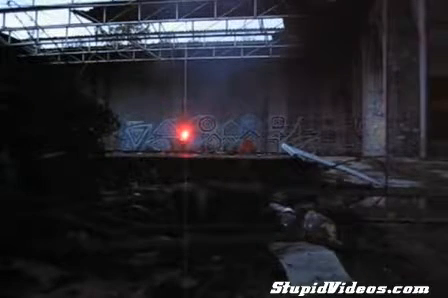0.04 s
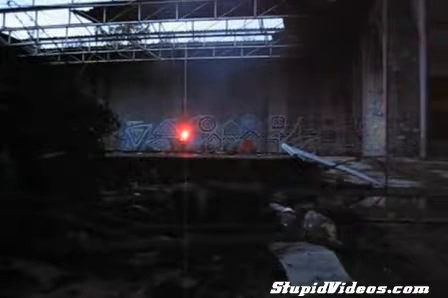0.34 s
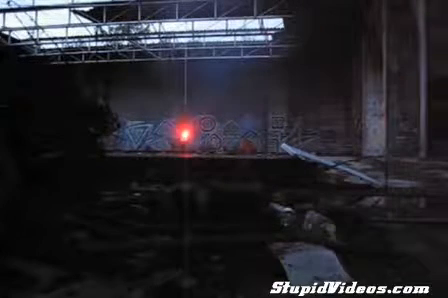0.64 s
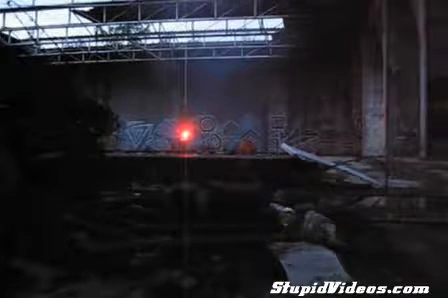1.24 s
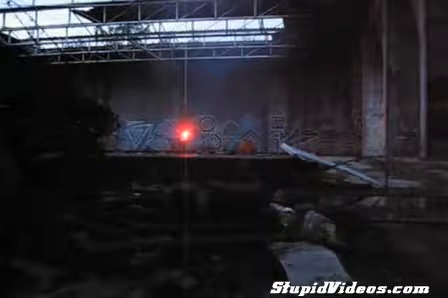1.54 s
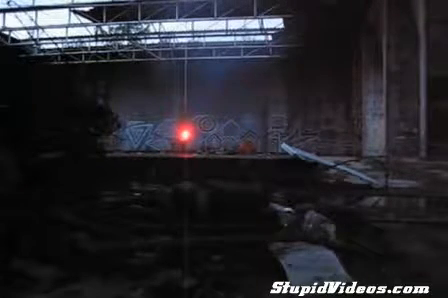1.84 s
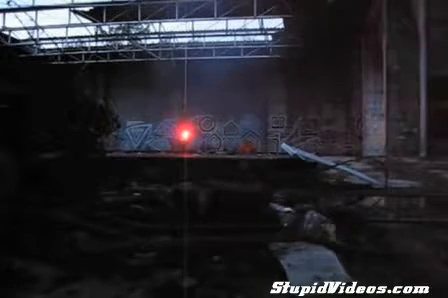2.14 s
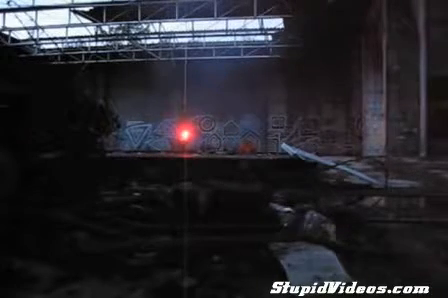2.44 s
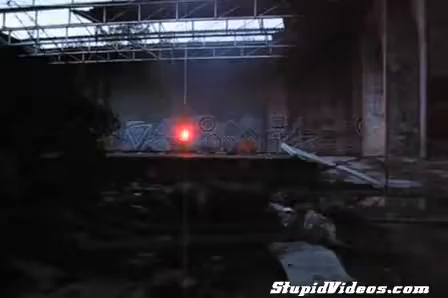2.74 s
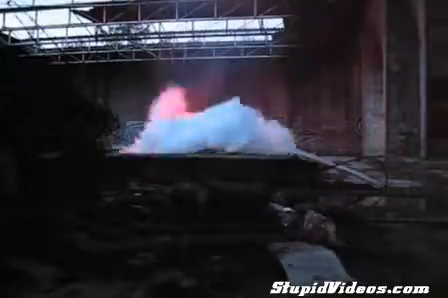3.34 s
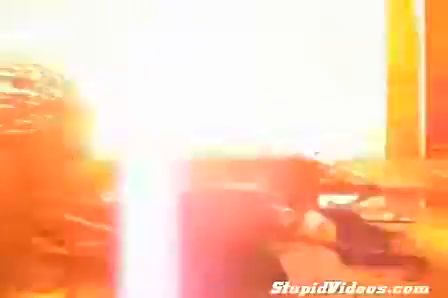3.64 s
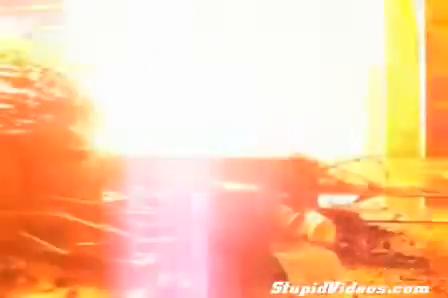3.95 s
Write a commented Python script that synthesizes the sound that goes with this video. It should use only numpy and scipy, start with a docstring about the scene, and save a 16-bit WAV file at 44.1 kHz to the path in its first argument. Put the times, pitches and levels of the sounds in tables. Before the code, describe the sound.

Gas explosion in a derelict hall: faint flare hiss, sudden crack, loud rush and distorted thuds.

```python
"""Gas tank rupture and fireball

A flare hisses over a low rumble beside a gas tank in a derelict hall. The tank cracks open, the gas
rushes out as a bright jet that swells into a roar, and the cloud ignites. The fireball's slow
pressure waves pin the overloaded microphone, chopping the roar into sputters and thuds."""
import sys
import numpy as np
from scipy import signal
from scipy.fft import rfft, irfft
from scipy.io import wavfile
from scipy.ndimage import uniform_filter1d

SR = 44100
rng = np.random.default_rng(int(sys.argv[2]) if len(sys.argv) > 2 else 0)


def master_out(mix):
    """Clip the mix to full scale and print it as 16-bit PCM to the path in sys.argv[1]."""
    frames = np.transpose(np.atleast_2d(mix))
    ceiling = np.clip(frames, -1, 1)
    pcm = np.round(ceiling * 32767).astype(np.int16)
    wavfile.write(sys.argv[1], SR, pcm)


N = 4 * SR

# tone of the flare's hiss: f/Hz, relative level/dB
HISS_SPECTRUM = [(20, -18), (200, -6), (330, -3.5), (450, -4.5), (620, -3.5), (800, -1), (1100, -5),
                 (1800, -5.5), (3200, -7.5), (4400, -6), (6800, -10.5), (9000, -19), (11000, -22.5),
                 (15000, -19.5)]
# fader ride on the hiss: t/s, level/dB
HISS_FADER = [(0, -42.5), (.4, -43.5), (1.15, -43.5), (1.4, -44.5), (1.85, -44), (2.05, -42.5), (2.5, -43),
              (2.9, -43.5)]
# tone of the hall's low rumble: f/Hz, relative level/dB
RUMBLE_SPECTRUM = [(15, -48), (35, -7), (58, 0), (72, -5), (88, 5.5), (112, -8.5), (140, -3), (168, 0.5),
                   (200, -14), (260, -15.5), (400, -57), (1000, -68)]
# fader ride on the rumble: t/s, level/dB
RUMBLE_FADER = [(0, -40.5), (.6, -41), (1.2, -37.5), (1.45, -41.5), (1.9, -37.5), (2.15, -40), (2.9, -38)]
# soft whistles of the flame: peak t/s, length/s, f/Hz, level/dB
WHISTLES = [(.16, 0.34, 1160, -56), (1.127, 0.28, 1280, -53.5), (2.12, 0.22, 1266, -53.5)]
# tone of the tank's shell cracking: f/Hz, relative level/dB
CRACK_SPECTRUM = [(20, -5), (150, 21), (600, 1), (2500, 0), (6000, -5.5), (15000, -36)]
# tone of the gas jet: f/Hz, relative level/dB
JET_SPECTRUM = [(20, 1), (90, -4), (200, 2.5), (420, 2), (700, 1.5), (1400, 3), (2800, 2.5), (5000, -4.5),
                (9500, -8.5), (11000, -36), (13000, -7), (16000, -53)]
# fader ride on the jet: t/s, level/dB
JET_FADER = [(2.97, -15.5), (3.03, -15.5), (3.12, -11.5), (3.3, -12.5), (3.55, -11), (3.72, -13.5),
             (4.0, -13.5)]
# tone of the spreading cloud's roar, ringing in the hall: f/Hz, relative level/dB
ROAR_SPECTRUM = [(20, -21), (60, -8), (130, 0.5), (230, -1), (320, -3), (440, -7), (580, 0), (900, -2.5),
                 (1300, -2.5), (1900, -8), (3000, -16), (6000, -23), (15000, -24)]
# fader ride on the roar: t/s, level/dB
ROAR_FADER = [(2.97, -30), (3.08, -27.5), (3.2, -6.5), (3.35, -7.5), (3.44, -8.5), (3.51, -4.5), (3.6, -10),
              (3.7, -8), (3.8, -9), (4.0, -13)]
# sweep of the roar's hollow resonance: t/s, f/Hz
HOLLOW_SWEEP = [(2.97, 2300), (3.12, 1830), (3.2, 1160), (3.29, 700), (3.36, 596), (3.442, 890),
                (3.55, 920), (3.68, 1170), (4.0, 1120)]
# fader ride on that resonance: t/s, level/dB
HOLLOW_FADER = [(2.97, -59), (3.1, -22.5), (3.2, -14.5), (3.34, -12), (3.44, -15), (3.54, -8.5),
                (3.61, -15), (3.68, -16), (4.0, -16)]
# tone of the fireball's pressure waves: f/Hz, relative level/dB
BUFFET_SPECTRUM = [(3, 4), (10, -8), (22, 3.5), (42, -6.5), (90, 0.5), (150, -8), (300, -15), (1000, -65),
                   (4000, -100)]
# fader ride on the pressure waves: t/s, level/dB
BUFFET_FADER = [(3.55, -61), (3.69, -21), (3.74, -11), (3.85, -12), (3.925, -7), (3.98, -1)]
# the fireball's biggest surges, each choking the microphone: peak t/s, length/s, level/dB
PRESSURE_SURGES = [(3.742, 0.0051, 20.5), (3.772, 0.033, -2.5), (3.8, 0.011, 2.5), (3.827, 0.0062, 6.5),
                   (3.863, 0.0087, 4.5), (3.888, 0.0095, 7), (3.908, 0.012, 2), (3.954, 0.0077, 5),
                   (3.991, 0.018, 7.5)]
# tone of the boom as the fireball fills the hall: f/Hz, relative level/dB
BOOM_SPECTRUM = [(20, -26), (55, -2), (85, 0), (130, -8), (200, -10), (320, -24), (600, -42), (2000, -90)]

RUPTURE_S, ATTACK_S = 2.9695, 0.0016
TIME = np.arange(N) / SR
FREQS = np.fft.rfftfreq(N, 1 / SR)


def amp(db):
    """Decibels to gain."""
    return 10 ** (np.asarray(db) / 20)


def unit(x):
    """Scales to an rms of 1."""
    return x / np.sqrt(np.mean(x ** 2) + 1e-20)


def fader(curve):
    """Gain ride through (t/s, level/dB) points."""
    return amp(np.interp(TIME, *np.transpose(curve)))


def swell(peak_s, length_s):
    """Bell-shaped envelope that peaks at 1."""
    return np.exp(-(2 * (TIME - peak_s) / length_s) ** 2)


def snap_open(start_s):
    """Gate that opens with a fast attack and stays open."""
    return np.clip((TIME - start_s) / ATTACK_S, 0, 1)


def noise(spectrum):
    """Steady noise at an rms of 1, shaped by (f/Hz, level/dB) points."""
    hz, db = np.transpose(spectrum)
    shape = amp(np.interp(np.log(FREQS + 1), np.log(hz + 1), db))
    return unit(irfft(rfft(rng.standard_normal(N)) * shape, N))


def hall(x, ripple_db=1.1, spacing_hz=25):
    """Colours a steady sound with the fine spectral ripple of many reflections."""
    ripple_hz = spacing_hz * np.arange(1, 4001)
    ripple = np.interp(FREQS, ripple_hz, rng.standard_normal(len(ripple_hz)))
    return unit(irfft(rfft(x) * amp(ripple_db * ripple), N))


def turbulent(x, patch_db, patch_s, patch_hz, flicker_db):
    """Turbulence: drifting patches of colour, and a quick flicker shared by all bands."""
    frames = signal.stft(x, nperseg=512, noverlap=384)[2].T
    cycles_per_s = np.fft.fftfreq(len(frames), 128 / SR)[:, None]
    cycles_per_hz = np.fft.fftfreq(frames.shape[1], SR / 512)
    blur = np.exp(-(cycles_per_s * patch_s) ** 2 - (cycles_per_hz * patch_hz) ** 2)
    speckle = rng.standard_normal(frames.shape)
    patches = unit(np.fft.ifft2(np.fft.fft2(speckle) * blur).real)
    flicker = unit(uniform_filter1d(rng.standard_normal(len(frames)), size=4))[:, None]
    frames = frames * amp(patch_db * patches + flicker_db * flicker)
    return unit(signal.istft(frames.T, nperseg=512, noverlap=384)[1][:N])


def resonate(x, hz, width_hz):
    """Swept band-pass that follows the curve hz."""
    carrier = np.exp(2j * np.pi * np.cumsum(hz) / SR)
    pole = np.exp(-np.pi * width_hz / SR)
    return 2 * (carrier * signal.lfilter([1 - pole], [1, -pole], x / carrier)).real


def high_pass(x, hz, order):
    """Rolls off the lows below hz."""
    return signal.lfilter(*signal.butter(order, hz, "high", fs=SR), x)


def saturate(x, ceiling_db, knee=2.22):
    """Soft clipper: rounds off everything that nears the ceiling."""
    return x / (1 + abs(x / amp(ceiling_db)) ** knee) ** (1 / knee)


def flare_hiss():
    """The flare burns with a gently wavering hiss."""
    hiss = turbulent(hall(noise(HISS_SPECTRUM)), patch_db=0.78, patch_s=0.16, patch_hz=610, flicker_db=0.5)
    return fader(HISS_FADER) * hiss


def hall_rumble():
    """A bed of low rumble in the hall."""
    return fader(RUMBLE_FADER) * noise(RUMBLE_SPECTRUM)


def flame_whistles(width_hz=75):
    """Now and then the flame whistles softly in one narrow band of noise."""
    out = np.zeros(N)
    for peak_s, length_s, hz, db in WHISTLES:
        band = np.exp(-((FREQS - hz) / width_hz) ** 2)
        whistle = unit(irfft(rfft(rng.standard_normal(N)) * band, N))
        out += amp(db) * swell(peak_s, length_s) * whistle
    return out


def tank_rupture(tear_lead_s=0.0063, hold_s=0.0042, decay_s=0.0016):
    """The shell starts to tear, then gives way with one short crack."""
    tear = amp(-29) * snap_open(RUPTURE_S - tear_lead_s) * noise(JET_SPECTRUM)
    crack = amp(-2.5) * snap_open(RUPTURE_S) * noise(CRACK_SPECTRUM)
    release = np.exp(-np.maximum(TIME - RUPTURE_S - hold_s, 0) / decay_s)
    return (tear + crack) * release


def gas_jet():
    """Gas rushes out in a bright, turbulent jet the moment the shell opens."""
    jet = turbulent(hall(noise(JET_SPECTRUM)), patch_db=2.5, patch_s=0.034, patch_hz=202, flicker_db=0.45)
    return snap_open(RUPTURE_S) * fader(JET_FADER) * jet


def cloud_roar(width_hz=820):
    """A deeper roar builds; its hollow resonance sinks as the cloud grows and climbs as it rises."""
    roar = turbulent(hall(noise(ROAR_SPECTRUM)), patch_db=2, patch_s=0.052, patch_hz=120, flicker_db=1)
    centre_hz = np.interp(TIME, *np.transpose(HOLLOW_SWEEP))
    swept = resonate(rng.standard_normal(N), centre_hz, width_hz)
    hollow = unit(resonate(swept, centre_hz, width_hz))  # second pass steepens the skirts
    return snap_open(RUPTURE_S) * (fader(ROAR_FADER) * roar + fader(HOLLOW_FADER) * hollow)


def fireball():
    """The cloud ignites: growing low buffeting with a few huge surges of pressure."""
    ignition_s = BUFFET_FADER[0][0]
    buffeting = (TIME > ignition_s) * fader(BUFFET_FADER) * noise(BUFFET_SPECTRUM)
    surges = sum(amp(db) * swell(peak_s, length_s) for peak_s, length_s, db in PRESSURE_SURGES)
    return buffeting + surges


def boom():
    """A short, deep swell as the fireball reaches its full size."""
    return swell(peak_s=3.97, length_s=0.056) * noise(BOOM_SPECTRUM)


def overload(x):
    """Microphone and preamp clip; the bass cut between them makes each pinned stretch sag to zero."""
    microphone = saturate(x, ceiling_db=-8.5)
    sagged = high_pass(microphone, hz=24, order=2)
    preamp = saturate(sagged, ceiling_db=-5)
    bleed = amp(-25.5) * high_pass(x, hz=492, order=2)  # a little gets past the overload
    mix = preamp + bleed
    return mix - 2 * high_pass(mix, hz=3500, order=1)  # the treble's phase flips: edges overshoot


def ducking_gain(x, threshold_db=-9, slope=0.32, response_s=0.22):
    """Slow compressor gain that eases down while the input stays very loud."""
    pole = np.exp(-1 / (response_s * SR))
    power_db = 10 * np.log10(signal.lfilter([1 - pole], [1, -pole], x ** 2) + 1e-12)
    return amp(-slope * np.maximum(power_db - threshold_db, 0))


def scene():
    """All layers reach one microphone, heard alike on both channels."""
    dip = amp(-14 * swell(peak_s=2.958, length_s=0.015))  # the bed dips briefly just before the crack
    bed = dip * (flare_hiss() + hall_rumble())
    air = bed + flame_whistles() + tank_rupture() + gas_jet() + cloud_roar() + fireball() + boom()
    return np.array([air, air])


def record(dry):
    """Overload and ducking, then a narrow treble notch and a high cut."""
    notch_hz, high_cut_hz = (10600, 11550), 15500
    eq = signal.firwin(511, [*notch_hz, high_cut_hz], window=("kaiser", 9), fs=SR)
    return signal.oaconvolve(overload(dry) * ducking_gain(dry), eq[None], "same")


dry = scene()
out = record(dry)
master_out(out)
```